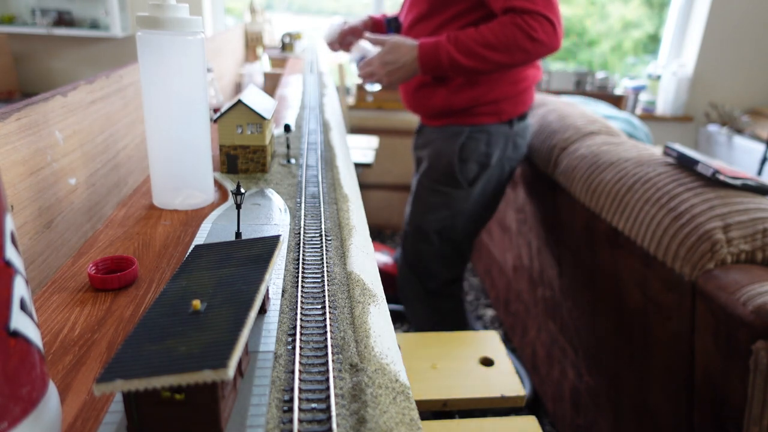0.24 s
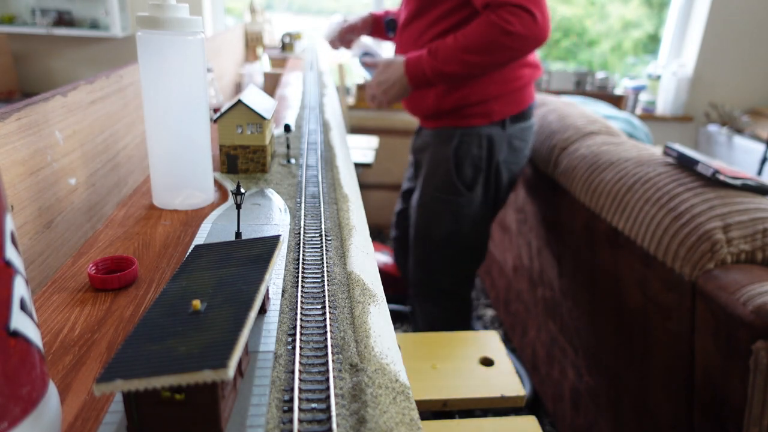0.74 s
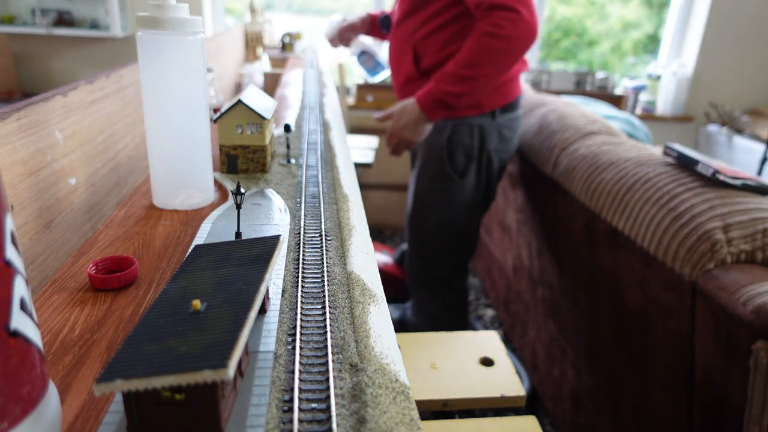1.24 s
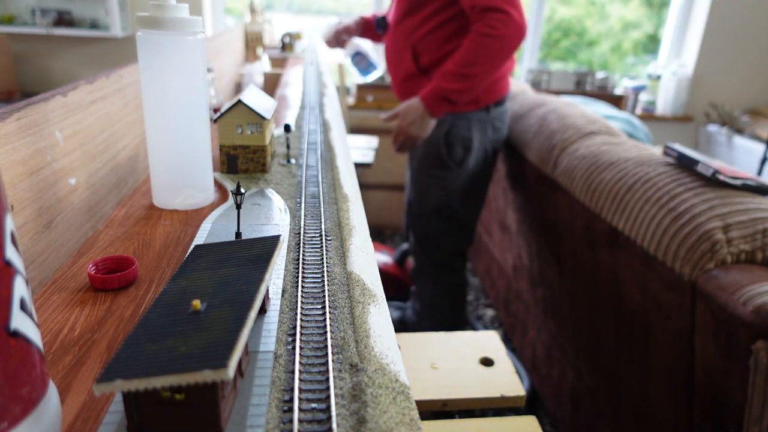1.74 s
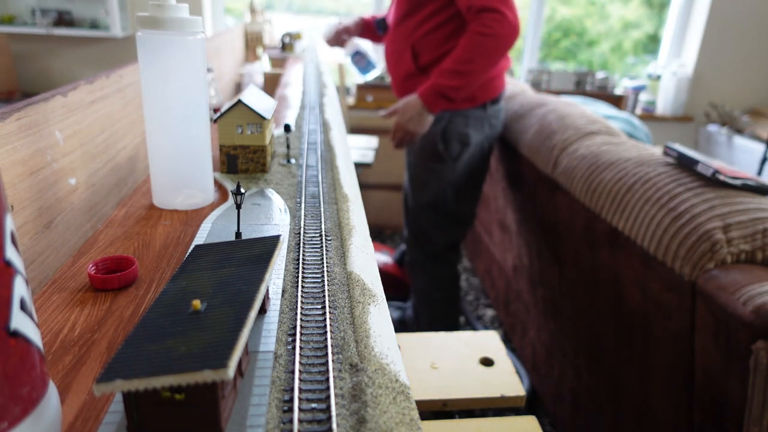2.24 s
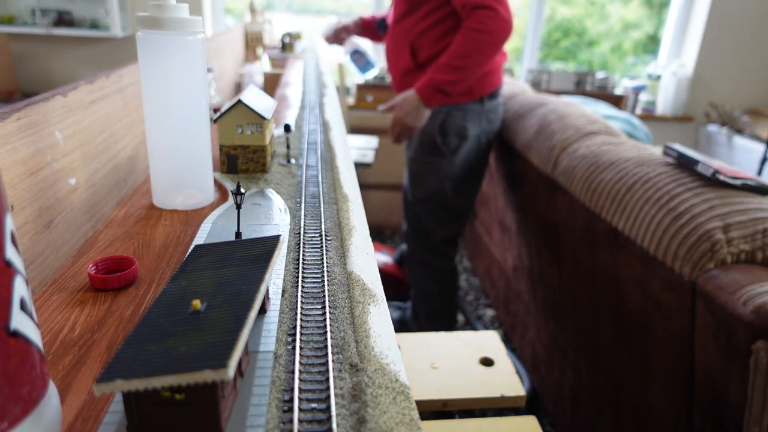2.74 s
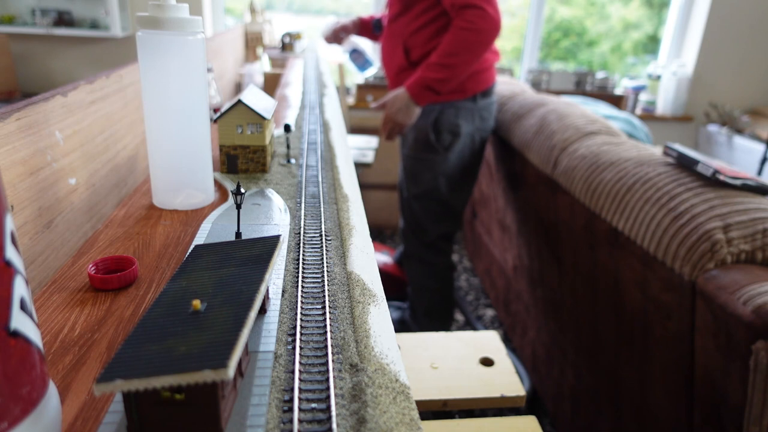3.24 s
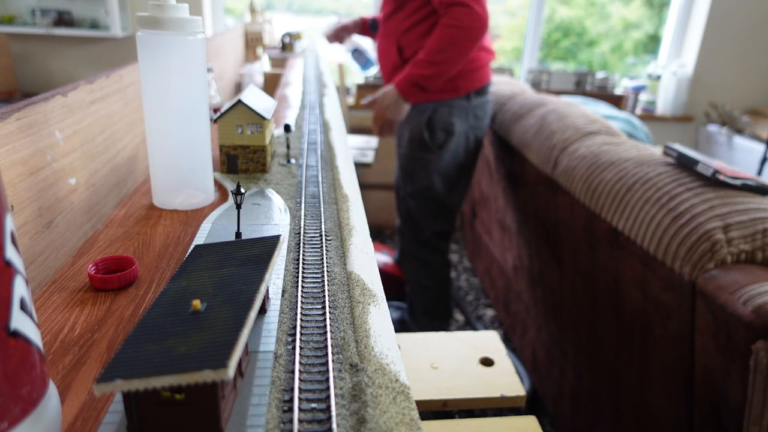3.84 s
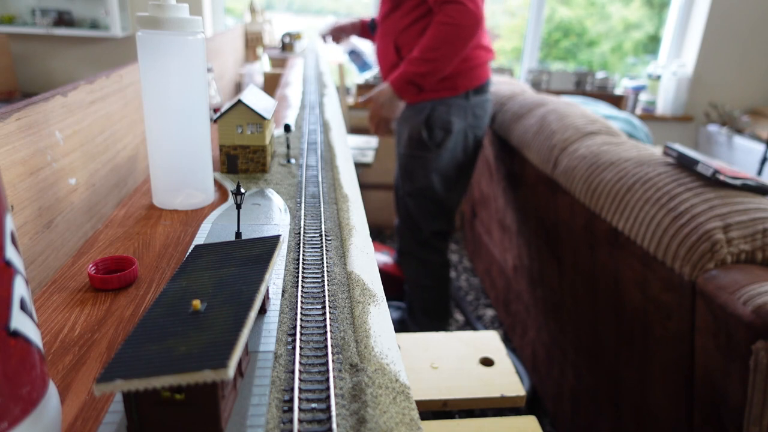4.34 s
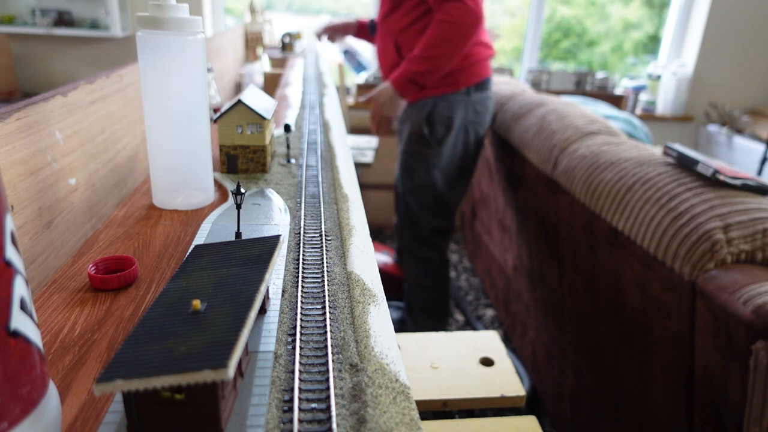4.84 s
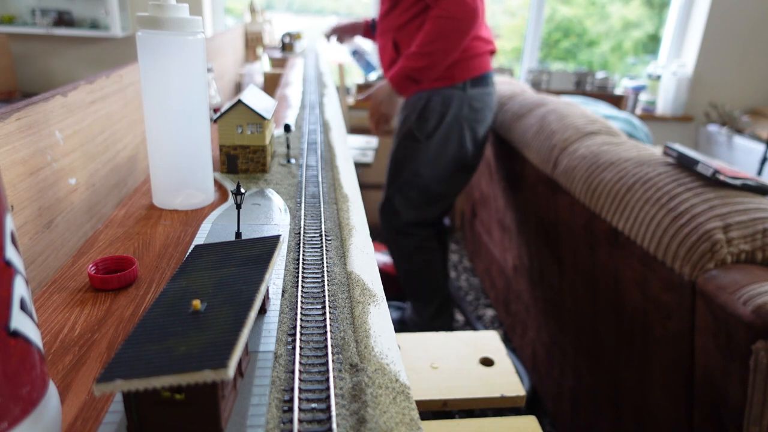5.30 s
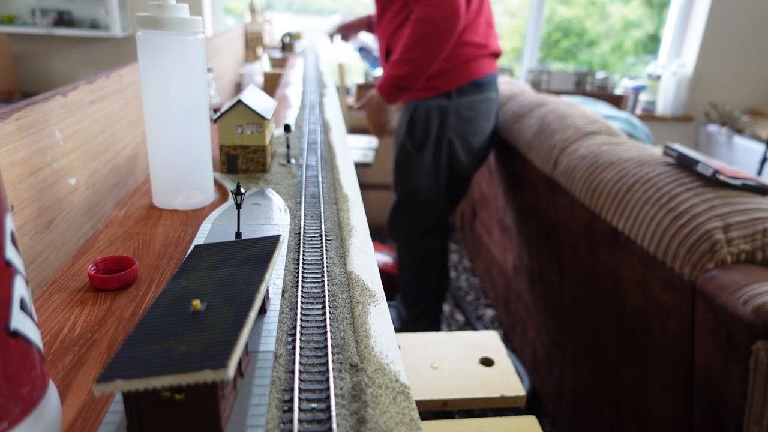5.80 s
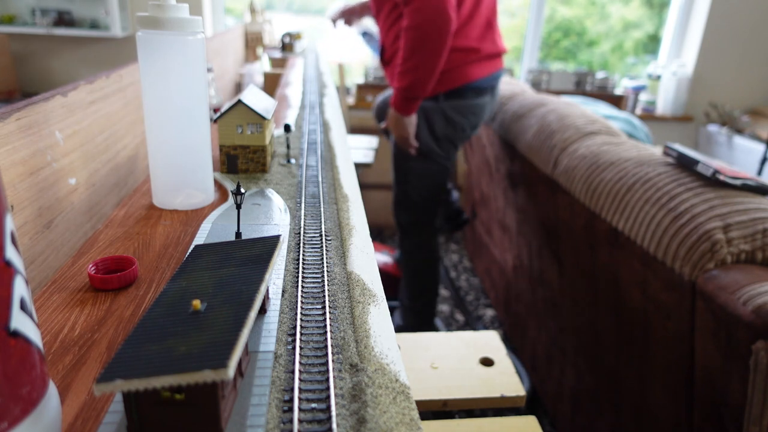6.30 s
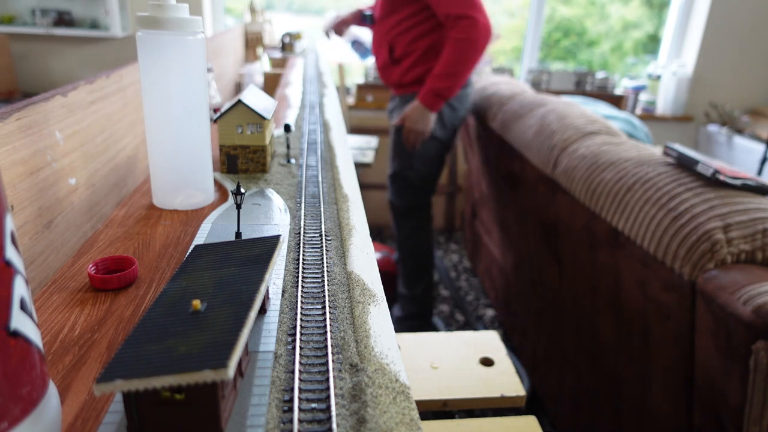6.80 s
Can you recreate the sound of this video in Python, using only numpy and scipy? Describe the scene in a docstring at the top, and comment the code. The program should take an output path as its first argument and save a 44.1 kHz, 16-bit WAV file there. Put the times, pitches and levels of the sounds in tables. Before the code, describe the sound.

In a small furnished room, a hand spray bottle a few metres away is pumped about four times a second. Each pull is a sharp, ratcheting plastic creak with a soft thump and short mist hiss, then a scratchy return click. A hollow wooden knock sounds near one second. Pumping stops after five and a half seconds; cloth rustles and small tocks follow over faint air hiss.

```python
"""Creaks, about four a second: a hand trigger spray bottle pumped in a small room, a few metres away.
Each pull is four quickening piston slips (ticks and plastic modes), a thump at the stop (bottle modes)
and a hiss of mist (shaped noise); a rough scrape through the same modes clicks the trigger back.
A knock on hollow wood, later a bump on furniture, are decaying modes with a noise tail.
At the end the person shifts: cloth rustles as clumpy noise. Air, hiss and whines lie beneath."""
import sys
import numpy as np
from scipy import signal
from scipy.io import wavfile
from scipy.ndimage import uniform_filter1d

SR = 44100
rng = np.random.default_rng(int(sys.argv[2]) if len(sys.argv) > 2 else 0)


def put_to_file(sound):
    """Save the sound as 16-bit audio at rate SR, in the file named by the first command-line argument."""
    columns = np.atleast_2d(sound).T  # one column per channel
    safe = np.clip(columns, -1, 1)
    whole_steps = np.round(safe * 32767)
    wavfile.write(sys.argv[1], SR, whole_steps.astype(np.int16))


def boost(x):
    """Linear amplitude factor 10**(x/20) for a level x in decibels (scalar or array-like)."""
    u = np.asarray(x, float) / 20
    return 10 ** u


N = 311346  # samples

# trigger pulls: (time [s], gap to second slip [ms], creak level [dB], mist level [dB], mist fullest after [ms])
PULLS = [(0.0327, 9.9, -3.5, -22, 78), (0.2685, 10, -1.5, -22, 68.5), (0.5068, 9.3, -2.5, -21.5, 76),
         (0.7571, 6.5, -4.5, -24.5, 60), (0.9928, 11, -3, -23.5, 69), (1.2379, 10.6, -4, -21.5, 78.5),
         (1.484, 9.9, -1.5, -23, 71.5), (1.722, 10, -4.5, -21.5, 72), (1.9517, 9.1, -2.5, -23, 62),
         (2.1724, 8.4, -1.5, -21, 69), (2.4028, 10.1, -2, -24.5, 70), (2.637, 9.6, -2.5, -24, 75),
         (2.869, 10.1, -1, -23, 77.5), (3.1259, 8.5, -4, -24, 83.5), (3.3692, 9.6, -4, -26, 71),
         (3.594, 9.8, -4.5, -29, 81), (3.8438, 9.3, -3.5, -26.5, 60), (4.0734, 9.2, -3, -26, 68),
         (4.3253, 12.3, -6, -30, 79), (4.571, 9.7, -4.5, -29, 79), (4.8224, 9.7, -5, -29, 74),
         (5.1932, 8.5, -9.5, -31, 78), (5.4902, 10.1, -4, -28, 79)]
# slips of one creak: (tick re creak [dB], head ring re creak [dB])
CREAK_SLIPS = [(-2, -9.5), (-1.5, -10), (-3.5, -9), (-4, -10.5)]
# tick resonances, middle: (frequency [Hz], width [Hz], level [dB])
TICK_MID = [(6960, 1130, 28), (7830, 2100, 22), (5120, 1900, 30.5)]
# tick resonances, top: (frequency [Hz], width [Hz], level [dB])
TICK_TOP = [(8810, 1730, 23.5), (10900, 1150, 10.5), (13800, 1060, 4.5)]
# plastic head modes: (frequency [Hz], width [Hz], level [dB])
HEAD_MODES = [(1754, 112, 0), (858, 102, -12), (1282, 266, -3), (2170, 240, -10), (2730, 478, 6.5),
              (426, 134, -10.5), (577, 280, -10.5), (3620, 505, 3), (1080, 470, 0.5)]
# the hand turns the bottle away:
# (time [s], main mode pitch factor [1], main mode offset [dB], tick top re middle [dB])
TURN = [(0, 0.98, -1, -4), (2, 0.96, -0.5, -4), (3.6, 1, -3, -5), (4.3, 0.99, -6.5, 1),
        (4.9, 0.92, -5.5, 6.5), (5.5, 0.88, -6, 1.5)]
# pulls whose last two ticks are faint: (time [s])
HASTY_PULLS = [0.2686, 0.7578, 0.9931, 2.1724]
# bottle modes: (frequency [Hz], width [Hz], level [dB])
BOTTLE_MODES = [(168, 47, 3.5), (207, 44.5, -2), (255, 15.3, -13.5), (540, 300, -25)]
# mist spectrum: (frequency [Hz], density [dB per Hz])
MIST_SPECTRUM = [(180, -14.5), (300, -10), (513, -9.5), (1040, -1.5), (1380, -3.5), (1660, 1), (1870, -2),
                 (2280, 1), (4170, -2.5), (7760, -1), (15200, -17), (16500, -55)]
# trigger springs back: (time [s], level [dB], head ring re level [dB])
RETURNS = [(0.212, -16, -6), (0.435, -16.5, -6), (0.6828, -14.5, -13.5), (0.9191, -16, -9),
           (1.168, -20, -5), (1.4284, -16.5, -8.5), (1.6533, -15.5, -6), (1.8993, -14.5, -13.5),
           (2.1135, -15, -5.5), (2.3446, -15, -11), (2.57, -15.5, -19), (2.811, -16, -14),
           (3.054, -18.5, -10), (3.3135, -19, -10), (3.5482, -21, -3), (3.781, -20, -1.5), (4.011, -23, -2),
           (4.253, -20.5, -9), (4.5177, -19, -3.5), (4.7618, -23, -2.5), (5.013, -23.5, -1),
           (5.3844, -18.5, -5), (5.6847, -20, -7)]
# short hollow tocks: (time [s], level [dB], frequency [Hz])
TOCKS = [(0.416, -25, 1330), (0.935, -22.5, 1110), (2.53, -28, 2830), (2.575, -17, 1220),
         (2.815, -21, 1320), (3.005, -22, 1260), (3.049, -23, 1250), (3.321, -20.5, 1190),
         (3.502, -26.5, 1240), (3.566, -29, 2880), (3.79, -22.5, 2930), (3.967, -28, 1050),
         (4.266, -23, 1180), (4.731, -28, 1600), (4.962, -27.5, 1620), (5.386, -23, 1160),
         (5.669, -17.5, 1210), (5.724, -29, 1110), (5.754, -29, 1610), (5.779, -28.5, 1080),
         (6.665, -27.5, 1160), (6.684, -24.5, 900), (6.708, -27, 990), (6.941, -18, 1730),
         (6.952, -16, 1620), (7.001, -18.5, 1200), (7.043, -13, 1670)]
# hollow wood modes: (frequency [Hz], level [dB], t60 [s])
WOOD = [(226.5, -4.5, 0.66), (323.5, 3.5, 0.37), (289, -7, 0.46), (272, -8, 0.46), (374, -2.5, 0.3),
        (450, -30, 0.63), (451, -7, 0.4), (495, -5, 0.68), (550, -3.5, 0.43), (590, -8, 0.64),
        (622, -16, 0.33), (845, -13, 0.39), (860, -13.5, 0.36), (1240, -27, .3), (1350, -3.5, 0.24),
        (2395, 1.5, 0.072), (150.5, -6.5, 0.21)]
# furniture modes: (frequency [Hz], level [dB], t60 [s])
BUMP = [(307, -2, 0.75), (264, -3.5, 0.68), (388, -25, 0.28), (755, 4, 0.056), (518, -16, .25)]
# knocks: (time [s], level [dB], diffuse tail offset [dB], modes table)
KNOCKS = [(1.08, -14.5, 1, WOOD), (5.905, -30, -7, BUMP)]
# diffuse tail spectrum: (frequency [Hz], density [dB per Hz])
KNOCK_TAIL = [(29, -62), (50, -23), (324, 7), (594, -0.5), (704, -9.5), (1390, -6.5), (2000, -10.5),
              (8570, -36), (15000, -49), (16500, -92)]
# cloth and shoe moves: (fullest at [s], level [dB], swell [dB/s], fade [dB/s], what rubs)
MOVES = [(5.1, -48, 55, 109, "sofa"), (5.78, -51, 62, 63, "shoe"), (5.913, -50.5, 400, 82, "shoe"),
         (6.098, -34, 200, 450, "sofa"), (6.13, -44.5, 30, 24, "shirt"), (6.667, -48, 1200, 80, "shoe"),
         (6.772, -48, 75, 1000, "sleeve"), (6.888, -44, 1200, 15, "shirt"), (6.95, -45, 175, 147, "shirt"),
         (7.045, -32.5, 167, 100, "shirt")]
# by what rubs: (low scuff [dB], narrow swish [dB], treble [dB]), all re rustle body
RUBS = {"shoe": (6, -8, -15), "sleeve": (-8, 3, -9), "shirt": (-9, -9, -3), "sofa": (-8, -14, -17)}
# rustle body spectrum: (frequency [Hz], density [dB per Hz])
CLOTH_SPECTRUM = [(210, -32), (350, -11), (667, -3), (1320, -2), (1500, -7), (1680, -5.5), (2040, -6),
                  (3510, -5), (5500, -17), (7150, -39), (12100, -120)]
# scuff, swish and treble spectra: (frequency [Hz], density [dB per Hz])
SCUFF_SPECTRUM = [(60, -30), (130, -8), (270, 0), (500, -5), (800, -30)]
SWISH_SPECTRUM = [(2500, -28), (3100, -8), (3800, 0), (4700, -7), (6300, -16), (7500, -36)]
TREBLE_SPECTRUM = [(3600, -25), (4900, 0), (6500, -1), (11000, -8), (15500, -17), (17000, -50)]
# weight shift through the floor: (time [s], level [dB], frequency [Hz])
STEPS = [(6.883, -28, 66)]
# room decay: (frequency [Hz], t60 [s])
ROOM_T60 = [(150, 0.73), (500, 0.62), (1500, 0.3), (4000, 0.089), (9000, 0.19), (16000, 0.16)]
# bench and wall echoes: (delay [ms], level [dB])
NEAR_ECHOES = [(2.2, -29), (5.4, -25.5)]
# air and hiss spectrum: (frequency [Hz], density [dB per Hz])
FLOOR_SPECTRUM = [(15, -48), (25, -16), (74, -12), (177, 11.5), (422, 7.5), (553, 5), (902, 8), (1930, 7),
                  (2090, 6.5), (3910, 4.5), (8830, -4.5), (12900, -14), (15200, -17), (16500, -44)]
# faint steady electronics: (frequency [Hz], level [dB])
WHINES = [(9001, -78), (11999, -89), (14998, -76)]
# deep murmur of the electronics: (frequency [Hz], density [dB per Hz])
RUMBLE_SPECTRUM = [(10, -3), (40, 0), (70, -20), (120, -60)]

GAP_RATIO = 0.82  # each slip gap re the one before
TICK_CHANCE_DB, RING_CHANCE_DB, TOP_CHANCE_DB = 1.5, 1.5, 3.0
FIRST_SLIP_DB_PER_S = -0.38  # later pulls have a gentler first slip
HASTY_DB = -6
GRIP_PER_S = 0.072  # tightening grip widens the head modes by this share each second
MIST_DELAY_MS, MIST_FALL_MS = 5.6, 61  # start; time from fullest to 15 dB down
# trigger meets its stop, counted from the first slip; later pulls are squeezed slower and further home
STOP_MS, STOP_MS_PER_S, STOP_CHANCE_MS = 17.3, 1.43, 4.12
THUMP_DB, THUMP_DB_PER_S, THUMP_CHANCE_DB = -27, 0.57, 1.7
THUMP_DB_PER_CREAK_DB = 0.39
SCRAPE_MS, SCRAPE_MS_PER_DB = 0.8, -0.14  # a softer return scrapes longer
SCATTER_DB, SCATTER_T60_S = -8, 0.03  # clutter on the bench
FLOOR_DB, RUMBLE_DB = -48, -79
MIC_LOW_HZ, MIC_TOP_HZ = 120, 15800


def evened(x):
    """Scales to rms 1."""
    return x / np.sqrt(np.mean(x ** 2) + 1e-20)


def read(points, hz):
    """Reads a table on a log-frequency axis."""
    f, value = np.transpose(points)
    return np.interp(np.log(hz + 1), np.log(f + 1), value)


def add(mix, s, sound):
    """Lays a sound into the mix at s seconds."""
    part = mix[round(s * SR):][:len(sound)]
    part += sound[:len(part)]


def noise(spectrum, patchy_db):
    """Coloured noise of rms 1 with small drifting time-frequency patches."""
    real, imag, patches = rng.standard_normal((N // 128 + 5, 257, 3)).T
    patches = uniform_filter1d(patches, size=6, axis=0)
    patches = evened(uniform_filter1d(patches, size=8, axis=1))
    level_db = read(spectrum, np.fft.rfftfreq(512, 1 / SR))[:, None] + patchy_db * patches
    z = (real + 1j * imag) * boost(level_db)
    return evened(signal.istft(z, nperseg=512, noverlap=384)[1][:N])


def ring(modes, force, spread, rise_ms):
    """A force through damped modes that swell in rise_ms, varied by spread; peak 1."""
    t = np.arange(2200) / SR
    hz, width_hz, db = np.transpose(modes)[:, :, None]
    detune, level, phase = rng.standard_normal((3, len(modes), 1))
    swell = 1 - np.exp(-(t * 1000 / rise_ms) ** 2)
    decay = boost(db + 70 * spread * level) * np.exp(-np.pi * width_hz * t)
    body = decay * np.sin(2 * np.pi * (hz * (1 + spread * detune) * t + phase))
    sound = np.convolve(force, swell * body.sum(0))
    return sound / abs(sound).max()


def burst(ms):
    """Rough force that starts almost at once and stops after about ms, never under 1 ms."""
    u = np.arange(500) / SR * 1000 / max(ms, 1)
    return np.minimum(u * 8, 1) * np.exp(-u ** 3) * rng.standard_normal(500)


def struck(roughness, ms):
    """A unit impact followed by a rough judder."""
    force = roughness * burst(ms)
    force[0] = 1
    return force


def slips():
    """Each slip of the piston seal ticks and strikes the plastic head, then judders; slips quicken."""
    out = np.zeros(N)
    when_s, pitch, main_db, top_db = np.transpose(TURN)
    chance = rng.standard_normal((len(PULLS), len(CREAK_SLIPS), 3))
    chance *= [TICK_CHANCE_DB, RING_CHANCE_DB, TOP_CHANCE_DB]
    for (s, gap_ms, creak_db, *_), luck_db in zip(PULLS, chance):
        head = np.array(HEAD_MODES, float)
        head[0, 0] *= np.interp(s, when_s, pitch)
        head[0, 2] += np.interp(s, when_s, main_db)
        head[:, 1] *= 1 + GRIP_PER_S * s
        top = np.interp(s, when_s, top_db)
        luck_db[0, :2] += FIRST_SLIP_DB_PER_S * s
        if np.isclose(s, HASTY_PULLS, atol=.01).any():
            luck_db[2:, 0] += HASTY_DB
        for (tick_db, head_db), (tick_luck, ring_luck, top_luck) in zip(CREAK_SLIPS, luck_db):
            chatter = struck(.065, ms=1.6)
            tick = ring(TICK_MID, chatter, .015, rise_ms=.45)
            tick = tick + boost(top + top_luck) * ring(TICK_TOP, chatter, .025, rise_ms=.4)
            add(out, s, boost(creak_db + tick_db + tick_luck) * tick / abs(tick).max())
            head_ring = ring(head, struck(.13, ms=4.97), .013, rise_ms=1.1)
            add(out, s, boost(creak_db + head_db + ring_luck) * head_ring)
            s += gap_ms / 1000
            gap_ms *= GAP_RATIO
    return out


def mist():
    """Pressure builds, the nozzle hisses, then fades; drops break up unevenly and sputter."""
    flow, ms = np.zeros(N), np.arange(SR // 4) / SR * 1000
    for s, _, _, mist_db, full_ms in PULLS:
        rise = np.clip((ms - MIST_DELAY_MS) / (full_ms - MIST_DELAY_MS), 0, 1) ** 0.24
        fall_db = -15 * (np.maximum(ms - full_ms, 0) / MIST_FALL_MS) ** 1.31
        add(flow, s, boost(mist_db + fall_db) * rise)
    sputter = evened(uniform_filter1d(rng.standard_normal(N), size=50))
    return flow * boost(1.2 * sputter) * noise(MIST_SPECTRUM, patchy_db=.6)


def thumps():
    """The trigger meets its stop and the bottle's low modes swell and ring."""
    out = np.zeros(N)
    for s, _, creak_db, *_ in PULLS:
        late, loud = rng.standard_normal(2)
        db = THUMP_DB + THUMP_DB_PER_CREAK_DB * creak_db + THUMP_DB_PER_S * s + THUMP_CHANCE_DB * loud
        stop_ms = abs(STOP_MS + STOP_MS_PER_S * s + STOP_CHANCE_MS * late)
        add(out, s + stop_ms / 1000, boost(db) * ring(BOTTLE_MODES, [1], .033, rise_ms=19))
    return out


def returns():
    """The sprung trigger scrapes home in a few milliseconds, exciting tick and head modes."""
    out = np.zeros(N)
    damped = np.multiply(HEAD_MODES, [1, 2.5, 1])  # the gripping hand deadens the head
    for s, db, head_db in RETURNS:
        force = burst(SCRAPE_MS + SCRAPE_MS_PER_DB * db)
        add(out, s, boost(db) * ring(TICK_MID + TICK_TOP, force, .03, rise_ms=.2))
        add(out, s, boost(db + head_db) * ring(damped, force, .04, rise_ms=.4))
    return out


def tocks():
    """Small tocks from hand and bottle: a hollow mode, an overtone and a bright click."""
    out = np.zeros(N)
    for s, db, hz in TOCKS:
        modes = [(hz, 330, 0), (1.9 * hz, 900, -8), (6800, 2500, -12)]
        add(out, s, boost(db) * ring(modes, [1], .0044, rise_ms=.14))
    return out


def knocks():
    """Modes and a diffuse tail that swell for a few milliseconds; the tail dies with the room."""
    out, t, tail = np.zeros(N), np.arange(SR) / SR, noise(KNOCK_TAIL, patchy_db=.8)
    swell = np.minimum(0.67 + t / 0.022, 1) * np.minimum(t / 0.0011, 1)
    for k, (s, level_db, tail_db, table) in enumerate(KNOCKS):
        hz, db, t60_s = np.transpose(table)[:, :, None]
        modes = boost(db - 60 * t / t60_s) * np.sin(2 * np.pi * (hz * t + rng.random(hz.shape)))
        diffuse = boost(tail_db - 60 * t / 0.69) * tail[k * SR:][:SR]
        add(out, s, boost(level_db) * (modes.sum(0) + diffuse) * swell)
    return out


def rustle():
    """Rubbing cloth and shoes: noise in soft clumps, mixed from scuff, body, swish and treble."""
    t, out = np.arange(N) / SR, np.zeros(N)
    scuff = noise(SCUFF_SPECTRUM, patchy_db=2.5)
    swish = noise(SWISH_SPECTRUM, patchy_db=.6)
    treble = noise(TREBLE_SPECTRUM, patchy_db=.8)
    body = noise(CLOTH_SPECTRUM, patchy_db=2.5)
    clumps = boost(1.3 * evened(uniform_filter1d(rng.standard_normal(N), size=150)))
    for s, db, swell, fade, kind in MOVES:
        level = boost(db - np.where(t < s, swell, fade) * abs(t - s))
        out += level * clumps * (body + boost(RUBS[kind]) @ np.array([scuff, swish, treble]))
    return out


def steps():
    """A weight shift sets two low floor modes ringing softly."""
    out = np.zeros(N)
    for s, db, hz in STEPS:
        add(out, s, boost(db) * ring([(hz, 45, 0), (3.3 * hz, 60, -9)], [1], .01, rise_ms=12))
    return out


def room(x, wet_db, near):
    """Near echoes and scatter, then sparse taps whose bands die at their own speed."""
    taps = np.zeros(SR)
    at = np.arange(350, SR - 20, 20)
    taps[at + rng.integers(0, 20, len(at))] = rng.choice([-1., 1.], len(at))
    hz, t, z = signal.stft(taps, SR, nperseg=256)
    t60_s = np.maximum(read(ROOM_T60, hz), .05)[:, None]
    tail = signal.istft(z * boost(-60 * t / t60_s), SR, nperseg=256)[1]
    tail *= boost(wet_db) / np.linalg.norm(tail)
    scatter = rng.standard_normal(2000) * boost(-60 * np.arange(2000) / SR / SCATTER_T60_S)
    tail[40:2040] += near * boost(SCATTER_DB) * scatter / np.linalg.norm(scatter)
    tail[0] += 1  # direct sound
    for ms, db in NEAR_ECHOES:
        tail[round(ms * SR / 1000)] += near * boost(db)
    return signal.fftconvolve(x, tail)[:N]


def floor():
    """Room air and microphone hiss as coloured noise, with faint sine whines."""
    t = np.arange(N) / SR
    whine = sum(np.sqrt(2) * boost(db) * np.sin(2 * np.pi * hz * t) for hz, db in WHINES)
    return boost(FLOOR_DB) * noise(FLOOR_SPECTRUM, patchy_db=2) + whine


def scene():
    """The bottle sounds through the room; mist and thumps get much weaker near echoes."""
    clicks = room(slips() + returns() + tocks(), wet_db=-12, near=1)
    spray = room(mist() + thumps(), wet_db=-13.5, near=.28)  # the mist and thumps take only a little of the near echoes and scatter
    return (clicks + spray + knocks() + rustle() + steps() + floor())[None]


def low_pass(x):
    """Removes everything above the highest recorded frequency."""
    return signal.sosfilt(signal.butter(12, 17080, fs=SR, output="sos"), x)


def record(dry):
    """A small microphone drops the deep bass, adds a murmur, overloads softly and loses the top."""
    bass_cut = signal.butter(2, MIC_LOW_HZ, "high", fs=SR, output="sos")
    top_cut = signal.butter(6, MIC_TOP_HZ, fs=SR, output="sos")
    heard = signal.sosfilt(bass_cut, dry)
    heard = heard + boost(RUMBLE_DB) * noise(RUMBLE_SPECTRUM, patchy_db=2)
    held = np.tanh(heard / 1.02) * 1.33
    finished = signal.sosfilt(top_cut, held)
    return low_pass(finished)


dry = scene()
out = record(dry)
put_to_file(out)
```